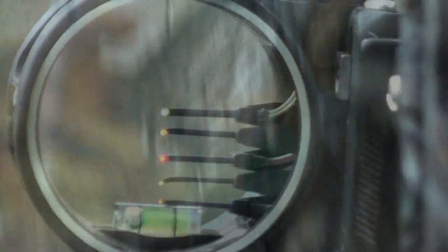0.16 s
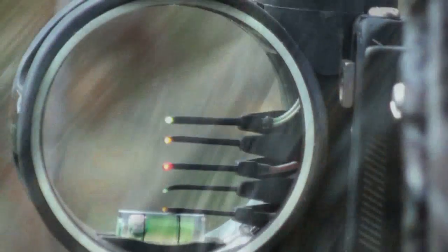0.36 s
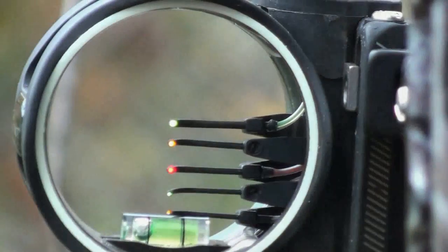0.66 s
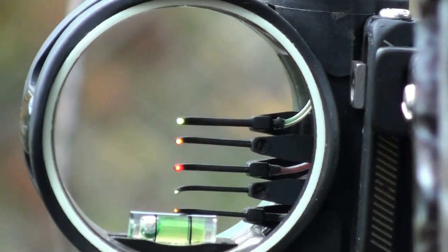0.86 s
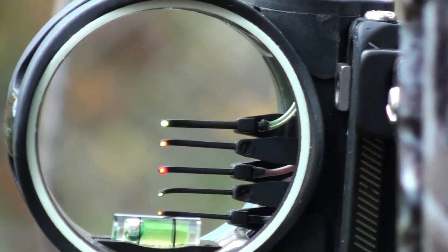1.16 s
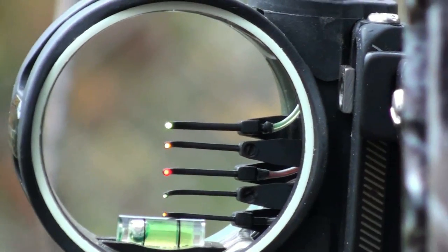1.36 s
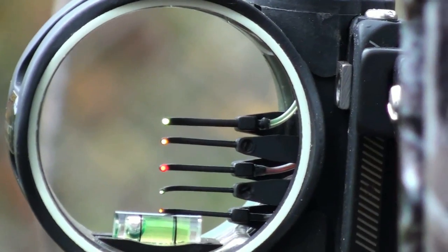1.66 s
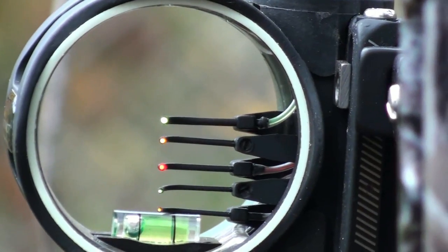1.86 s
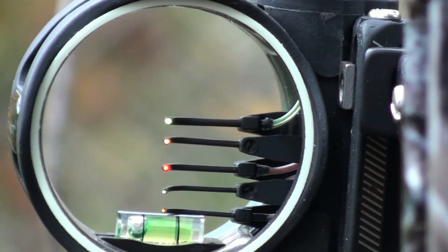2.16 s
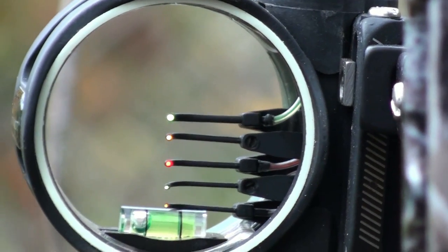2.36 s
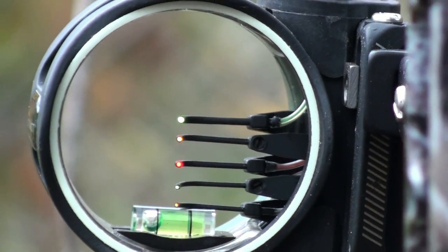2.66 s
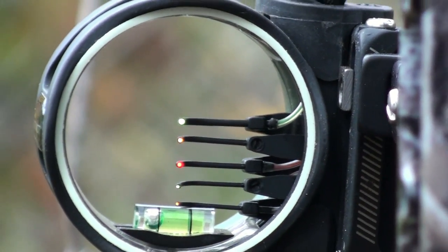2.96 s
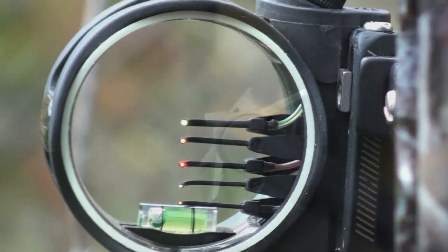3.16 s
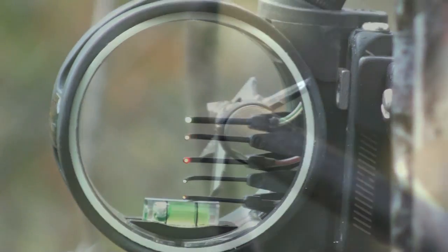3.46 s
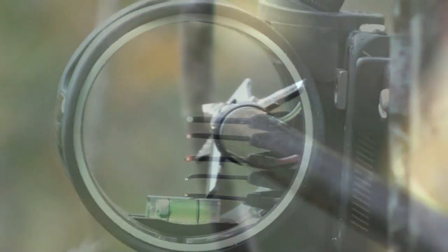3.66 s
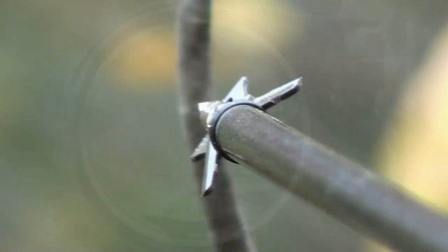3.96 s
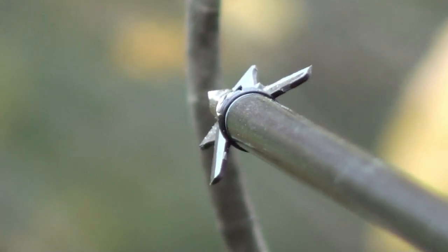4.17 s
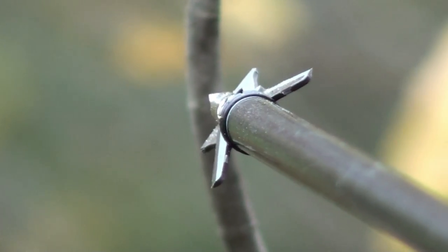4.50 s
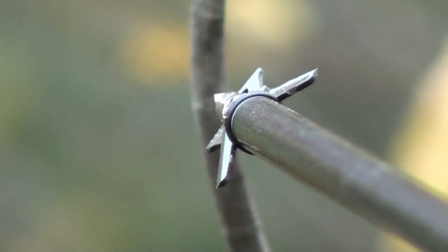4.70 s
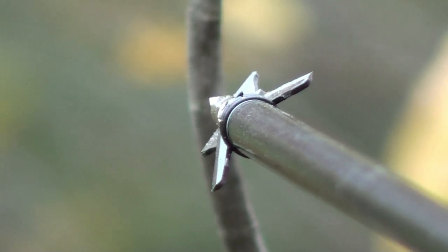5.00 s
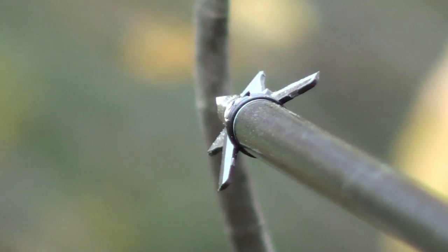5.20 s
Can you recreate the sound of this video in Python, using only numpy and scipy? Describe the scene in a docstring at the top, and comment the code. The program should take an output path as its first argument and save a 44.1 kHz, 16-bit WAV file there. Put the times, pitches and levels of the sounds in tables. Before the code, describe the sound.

Close to a hand-held stereo camera microphone outdoors, low rumble and hiss fade during the first second while hard gear clicks cluster around a third of a second, followed by a small creak and cloth rubs. Afterwards quiet woods remain: a continuous cricket trill, high insect hiss, soft air, one tiny bird chip and a few faint taps.

```python
"""Autumn woodland, heard by a hand-held camera: a tree cricket trills in falling strokes of tone
and far insect choruses hiss as bands of noise. At first gear clicks, rattles and rubs close by, from damped
modes and shaped noise, over a fading throb, rumble and hiss. Later a bird chips on a fast falling tone, a far
one peeps and small things tap on sagging notes. Behind it lie noise for the air and a far motor's hum."""
import sys
import numpy as np
from scipy import signal
from scipy.fft import rfft, irfft, next_fast_len
from scipy.io import wavfile
from scipy.ndimage import uniform_filter1d, map_coordinates

SR = 44100
rng = np.random.default_rng(int(sys.argv[2]) if len(sys.argv) > 2 else 0)


def store_wav(level_fs):
    """Save 16-bit WAV to argv[1]."""
    pcm = np.round(np.clip(np.atleast_2d(level_fs), -1, 1) * 32767)
    wavfile.write(sys.argv[1], SR, pcm.T.astype(np.int16))


N = 235449  # length in samples


def amp(db):
    """Turn dB into gain."""
    return 10 ** (np.asarray(db) / 20)


def unit(x):
    """Scale x to rms 1."""
    return x / np.sqrt(np.mean(x ** 2) + 1e-20)


def along(points, hz):
    """Read a curve of (Hz, value) points on a log frequency axis."""
    point_hz, value = np.transpose(points)
    return np.interp(np.log(hz + 1), np.log(point_hz + 1), value)


def curves(rows):
    """Draw one value per sample for each column after the time."""
    start_s, *columns = np.transpose(rows)
    return [np.interp(np.arange(N) / SR, start_s, column) for column in columns]


def wobble(rate):
    """Draw a smooth random curve with rate knots a second."""
    knots = rng.standard_normal(int(N * rate / SR) + 4)
    return map_coordinates(knots, [np.arange(N) * rate / SR])


def envelope(start, attack, hold, t60):
    """Gain that rises in a line, holds, then decays exponentially."""
    t = np.arange(N) / SR - start
    return np.clip(t / attack, 0, 1) * amp(-60 * np.clip(t - attack - hold, 0, None) / t60)


def fading(length):
    """Gain that falls straight from 1 to 0 over the first length seconds."""
    return np.clip(1 - np.arange(N) / SR / length, 0, 1)


def filtered(x, response):
    """Multiply the spectrum of x by a function of frequency."""
    m = next_fast_len(N + SR // 4)
    return irfft(rfft(x, m) * response(np.fft.rfftfreq(m, 1 / SR)), m)[..., :N]


def ports(pair, lead):
    """Two microphone ports: the left one leads by a phase that depends on frequency."""
    return filtered(pair, lambda hz: np.exp(.5j * np.outer([1, -1], along(lead, hz))))


def rush(spectrum, alike, lead, patchy_db):
    """Stereo noise of rms 1, shaped in spectrum and width, with patches of random gain."""
    z = signal.stft(rng.standard_normal((2, N)), nperseg=512)[2]
    field = rng.standard_normal(z.shape[1:])
    field = uniform_filter1d(uniform_filter1d(field, size=6, axis=0), size=10, axis=1)
    pair = signal.istft(z * amp(patchy_db * unit(field)), nperseg=512)[1][:, :N]

    def mid_side(hz):
        turn = np.arccos(np.clip(along(alike, hz), -1, 1)) / 2  # more likeness, less side
        in_band = (hz >= spectrum[0][0]) * (hz <= spectrum[-1][0])
        return amp(along(spectrum, hz)) * in_band * [np.cos(turn), np.sin(turn)]

    mid, side = filtered(pair, mid_side)
    return unit(ports(np.array([mid + side, mid - side]), lead))


# How long the trees ring on: pitch_hz, decay_t60_s
TREE_DECAY = [(200, 0.18), (2000, 0.072), (10000, 0.26)]


def echo(x):
    """Trunks and ground answer with a noise tail; each frequency dies at its own speed."""
    hz, t, z = signal.stft(rng.standard_normal((2, SR // 4)), SR, nperseg=128)
    decay = amp(-60 * t / along(TREE_DECAY, hz)[:, None])
    tail = signal.istft(z * decay, SR, nperseg=128)[1]
    return signal.fftconvolve(x, tail / np.linalg.norm(tail[0]), axes=1)[:, :N]


# Insect levels through the scene: start_s, low_chorus_level_db, near_cricket_level_db
INSECT_LEVELS = [(0, -66, -66), (.8, -65.5, -67), (1.7, -66, -65.5), (2.2, -66.5, -68), (2.8, -64.5, -62.5),
                 (3.2, -66, -65), (3.55, -66.5, -64), (3.85, -64.5, -64.5), (4.2, -62.5, -61),
                 (4.8, -63, -63), (5.34, -62, -62)]
# Spectrum of farther crickets of the same kind: pitch_hz, level_db (per Hz)
NEIGHBOURS = [(2200, -30), (2300, -8), (2450, -3), (2540, 0), (2610, -8), (2720, -30)]
STROKE_HZ, NEIGHBOURS_DB = 35.77, -69.5  # wing strokes a second; level of the farther singers


def cricket():
    """Each wing stroke is a short tone that falls as the scraper slows; farther singers blur around it."""
    count = np.arange(N) * STROKE_HZ / SR + .655
    stroke = count.astype(int)
    t = (count % 1 - .5) / STROKE_HZ  # seconds from the middle of the stroke
    chance = rng.standard_normal((stroke[-1] + 1, 2))[stroke]
    # 2380 Hz at mid stroke, falling 9600 Hz per second
    phase = 2 * np.pi * (2380 * t - 4800 * t * t) + .5 * chance[:, 0]
    swell = np.exp(-(t / .01) ** 4) * amp(chance[:, 1])
    song = amp(curves(INSECT_LEVELS)[1]) * unit(swell * np.sin(phase))
    near = ports(np.array([song, song]), [(2400, .5)]) + amp(-9) * echo(song[None])
    return near + amp(NEIGHBOURS_DB) * rush(NEIGHBOURS, [(2400, .6)], [(2400, .8)], patchy_db=1.5)


# Spectra of the low and high insect bands: pitch_hz, level_db (per Hz)
LOW_CHORUS = [(3600, -16), (3900, -5.5), (4200, 2), (4420, 4), (4700, -3), (5100, -9.5), (5400, -35)]
HIGH_CHORUS = [(5300, -36), (5600, 3), (5780, 3.5), (6300, 2.5), (6500, 1), (6600, 2.5), (6900, -46)]
HIGH_DB, HIGH_START_DB = -1, -3  # high band over the low one; extra at the very start
FADE_S = 0.94  # the opening's rumble and hiss die while the high chorus comes up


def chorus():
    """Many far insects blur into two noise bands; the lower one still flutters near 47 Hz."""
    beat = 1 + 0.19 * np.sin(2 * np.pi * np.cumsum(47 + 2 * wobble(3.3)) / SR)
    low = beat * rush(LOW_CHORUS, [(4400, 0.66)], [(4400, 0.31)], patchy_db=1.0) * amp([[.7], [-.7]])
    high = rush(HIGH_CHORUS, [(6000, 0.97)], [(6000, 1.38)], patchy_db=1.0) * amp([[1.8], [-1.8]])
    high_gain = amp(HIGH_DB + HIGH_START_DB * fading(FADE_S))
    return amp(curves(INSECT_LEVELS)[0]) * (low + high_gain * high)


# Single gear clicks: start_s, knock_level_db, then over the knock: snap_db, crack_db, thud_db
CLICKS = [(.273, -39, 0, -15, -6), (.292, -15.5, 0, -19, 0), (.31, -18, -1.5, -14, -4.5),
          (0.325, -34, 13, -6, 3), (0.338, -21, 2.5, -12, 1.5), (0.342, -26.5, 8, -16, -12),
          (.3575, -20.5, 1.5, -6, 3), (.359, -12, -4, -13, -3), (.363, -20, 0, -23, -20),
          (.367, -13.5, -6.5, -30, -9), (.37, -22.5, -9, -30, 1), (.375, -32, -1, -17, 7),
          (0.4538, -41, -2, -17, 7), (.571, -42.5, -10, -21, 7), (.64, -33, -7.5, -28, -16),
          (0.666, -44, -15, -12, 1), (0.6692, -28.5, -4, -10, 5), (.901, -44, 3, -17, -7)]
# A run of light slips: start_s
CREAK = [.485, .497, .507, .516, .525, .534]
CREAK_DB, CREAK_FADE_DB, CREAK_THUD_DB = -29, 1.1, -14  # first slip; drop per slip; thud over knock
CREAK_SNAP_DB, CREAK_CRACK_DB, CREAK_DULLS_DB = -1, -10, 1.5  # over knock at first; dulling per slip


def slips():
    """Single clicks, then the creak whose slips grow weaker and duller, as rows like CLICKS."""
    creak = []
    for k, start_s in enumerate(CREAK):
        snap_db = CREAK_SNAP_DB - CREAK_DULLS_DB * k
        crack_db = CREAK_CRACK_DB - 2 * CREAK_DULLS_DB * k
        creak.append((start_s, CREAK_DB - CREAK_FADE_DB * k, snap_db, crack_db, CREAK_THUD_DB))
    return list(CLICKS) + creak


def ring(modes, t):
    """Damped modes at new strengths and phases for each blow and each port."""
    chance = rng.standard_normal((len(modes), 2, 2, 1)) * [[[1.5]], [[.5]]]  # dB, radians
    total = 0
    for (hz, db, t60), (extra_db, phase) in zip(modes, chance):
        total = total + amp(db + extra_db - 60 * t / t60) * np.sin(2 * np.pi * hz * t + phase)
    return total


# Modes of the gear's body, its small parts and its frame: pitch_hz, level_db, decay_t60_s
BODY_MODES = [(1040, -3, .024), (1170, -4, .024), (1320, -8, .02)]
SMALL_PART_MODES = [(1680, -0.5, 0.012), (2065, 1.5, 0.008), (2906, -2.5, 0.0066), (3380, -3, 0.0041),
                    (4910, -13, 0.0053)]
FRAME_MODES = [(300, -18.5, 0.017), (380, -15, 0.037), (594, -28, 0.018), (758, -7.5, 0.03),
               (893, -2, 0.022)]
# Phase between the ports for the close gear: pitch_hz, left_lead_rad
NEAR_LEAD = [(170, 0), (500, 1.8), (1400, 2.6), (2400, 1.7), (5000, 1.2), (10500, 1.5), (11500, -.2)]
GEAR_PAN_DB = -3  # left over right


def clicks():
    """Each slip of the gear knocks its body and frame, snaps its small parts and cracks."""
    out, t = np.zeros((2, N)), np.arange(SR // 10) / SR
    for start_s, db, snap_db, crack_db, thud_db in slips():
        crack = np.diff(rng.standard_normal(len(t) + 1)) * amp(-60 * t / 0.0076)
        knock = ring(BODY_MODES, t) + amp(thud_db) * ring(FRAME_MODES, t)
        knock = knock * (1 - np.exp(-t / 0.00069))
        snap = amp(snap_db) * ring(SMALL_PART_MODES, t) * (1 - np.exp(-t / 0.00019))
        sides = knock + snap * amp([[3], [-3]]) + amp(crack_db) * crack  # the snap faces the left port
        out[:, round(start_s * SR):][:, :len(t)] += sides * amp(db)
    panned = out * amp([[GEAR_PAN_DB / 2], [-GEAR_PAN_DB / 2]])
    # the clicks carry little below 170 Hz and little above 13.5 kHz
    band = lambda hz: 1 / (1 + (hz / 13500) ** 8) / (1 + (170 / (hz + 1)) ** 4)
    return ports(filtered(panned, band), NEAR_LEAD)


# Spectra of the loose parts and of the hiss bursts: pitch_hz, level_db (per Hz)
RATTLE = [(120, -23), (200, -10), (1120, 1.5), (1740, -2), (2010, -13), (2250, -1), (3870, -14.5),
          (9000, -29), (11700, -54), (19800, -120)]
BURST_HISS = [(1760, -32), (3000, -6), (3800, -2), (4310, -0.5), (13300, -6), (15800, -12)]
# Hiss bursts: the big click's short hissing tail, then two cloth slides:
# start_s, attack_s, hold_s, level_db, release_t60_s, stirred_rattle_level_db
HISS_BURSTS = [(0.359, 0.0014, 0.0017, -35, 0.057, -62), (.486, 0.011, 0.03, -54.5, .1, -51),
               (0.649, 0.045, 0.036, -52, 0.085, -49.5)]
# Likeness of left and right in wide sounds: pitch_hz, likeness (0 to 1)
ALIKE = [(20, .75), (60, .85), (170, .55), (340, .3), (700, .5), (2000, .45), (3400, .4), (7000, .3),
         (10500, .2), (11500, .9)]
SHAKE_DB, SHAKE_T60_S = -18, 0.077  # loose parts after each single click, over its knock


def handling():
    """Loose parts rattle in grains after each jolt; a click's tail and two cloth slides hiss and stir them."""
    jolts = np.zeros(N)
    for start_s, db, *_ in CLICKS:
        jolts[round(start_s * SR)] = amp(db + SHAKE_DB)
    decay = amp(-60 * np.arange(SR // 2) / SR / SHAKE_T60_S)
    shake = np.abs(signal.fftconvolve(jolts, decay)[:N])
    burst, stir = np.zeros(N), np.zeros(N)
    for start_s, attack, hold, db, t60, stir_db in HISS_BURSTS:
        swell = envelope(start_s, attack, hold, t60)
        burst += amp(db) * swell
        stir += amp(stir_db) * swell
    grains = amp(4.7 * wobble(500))
    rattle = unit(grains * rush(RATTLE, [(1000, 0.2)], NEAR_LEAD, patchy_db=0.0))
    return (shake + stir) * rattle + burst * rush(BURST_HISS, ALIKE, NEAR_LEAD, patchy_db=1.5)


# Spectra of the opening's rumble and hiss: pitch_hz, level_db (per Hz)
RUMBLE = [(8.8, -31), (15, -1), (34, 2.5), (64, -21), (97, -2), (286, -11), (500, -19.5), (650, -47),
          (1100, -120)]
HISS = [(240, -27), (400, -2.5), (877, -3), (947, 2.5), (1600, -4.5), (2460, -2.5), (11600, -10.5),
        (15800, -21)]
# Phase between the ports for diffuse sound: pitch_hz, left_lead_rad
DIFFUSE_LEAD = [(170, 0), (350, 1.7), (550, 2.3), (2000, 2), (3400, 2.2), (7000, 1.7), (10500, 1.5),
                (11500, -.2)]
RUMBLE_DB, HISS_DB, THROB_DB = -51, -48.5, -57.5  # before the fades
DRONE_HZ, THROB_S = 47.4, .45  # mean pulse rate; fade time of the throb


def opening():
    """A drone of uneven low pulses, its rumble and a broad hiss die away."""
    turn = np.cumsum(DRONE_HZ * (1 + 0.028 * wobble(8.3))) / SR
    pulses = np.diff(np.floor(turn), prepend=0) * amp(1.5 * wobble(40))  # one pulse per turn
    throb = unit(filtered(pulses, lambda hz: (hz > 70) / (1 + (hz / 170) ** 3)))
    rumble = amp(RUMBLE_DB) * rush(RUMBLE, [(30, 0.93), (400, 0.33)], DIFFUSE_LEAD, patchy_db=3.0)
    hiss_lead = [(500, 5.0), (2400, 0.2), (7000, 0.5)]
    hiss = amp(HISS_DB) * rush(HISS, ALIKE, hiss_lead, patchy_db=1.5)
    return amp(THROB_DB) * fading(THROB_S) * throb + fading(FADE_S) * (rumble + hiss)


# Trunks return the chip's low end: delay_s, level_db (over the chip)
CHIP_ANSWERS = [(0.013, -4), (.03, -1), (.047, -14)]
# A far two-note call: start_s, hold_s, level_db
PEEP = [(3.123, 0.022, -58), (3.159, 0.0097, -61)]
CHIP_S, CHIP_DB, CHIP_ATTACK_S, CHIP_HOLD_S, CHIP_T60_S = 1.704, -56, 0.013, .012, 0.094
CHIP_TOP_HZ, CHIP_END_HZ, CHIP_FALL_HZ_PER_S = 12700, 4400, 320000  # falls fast, then stays
PEEP_HZ, PEEP_ATTACK_S, PEEP_T60_S = 1360, 0.0032, 0.015


def bird():
    """One fast falling chip on a rough tone among the trees, and a far peep on a steady tone."""
    t = np.arange(N) / SR
    fall = CHIP_TOP_HZ - CHIP_FALL_HZ_PER_S * (t - CHIP_S)
    hz = np.clip(fall, CHIP_END_HZ, CHIP_TOP_HZ) * (1 + 0.0197 * wobble(900))
    gain = amp(CHIP_DB) * envelope(CHIP_S, CHIP_ATTACK_S, CHIP_HOLD_S, CHIP_T60_S)
    chip = gain * np.sin(2 * np.pi * np.cumsum(hz) / SR)
    dull = filtered(chip, lambda f: 1 / (1 + (f / 6500) ** 6))
    chip = chip + sum(amp(db) * np.roll(dull, round(delay_s * SR)) for delay_s, db in CHIP_ANSWERS)
    notes = sum(amp(db) * envelope(s, PEEP_ATTACK_S, hold, PEEP_T60_S) for s, hold, db in PEEP)
    peep = notes * np.sqrt(2) * np.sin(2 * np.pi * PEEP_HZ * t)
    return chip + amp(-2) * echo(chip[None]) + peep


# Small taps: start_s, pitch_hz (at the start), level_db, decay_t60_s, pan_db (left over right)
TAPS = [(.147, 1880, -42, .02, 4), (2.37, 1610, -43, .03, 3), (2.396, 343, -42.5, 0.029, 3),
        (4.948, 895, -44, .03, -3), (4.9575, 365, -32, 0.017, 7.5)]
TAP_SAG_PER_S = 24  # rate of the pitch's exponential fall


def taps():
    """Soft small taps, each on one damped note that sags."""
    out, t = np.zeros((2, N)), np.arange(SR // 5) / SR
    sagging_s = (1 - np.exp(-TAP_SAG_PER_S * t)) / TAP_SAG_PER_S  # time that slows down
    onset = 1 - np.exp(-t / 0.00052)
    for start_s, hz, db, t60, pan_db in TAPS:
        tap = -amp(db - 60 * t / t60) * np.sin(2 * np.pi * hz * sagging_s) * onset
        out[:, round(start_s * SR):][:, :len(t)] += tap * amp([[pan_db / 2], [-pan_db / 2]])
    return ports(filtered(out, lambda hz: 1 / (1 + (150 / (hz + 1)) ** 4)), DIFFUSE_LEAD)


# Spectra of the air and the hum: pitch_hz, level_db (per Hz)
AIR = [(15, 8), (35, -10.5), (60, -3), (160, -1), (500, 0), (1000, 3), (1700, -1), (2200, -2), (2800, -3.5),
       (3400, -6.5), (5200, -7.5), (7500, -12), (12000, -18.5), (15800, -22)]
HUM = [(60, -70), (80, -14), (97, 12.5), (118, 5.5), (150, -18)]
# Thin steady tones: pitch_hz, level_db (before a slow waver)
WHINE = [(839.8, -76), (1679.6, -86)]
AIR_DB, HUM_DB = -54, -68.5  # before the lull and the wavering
LULL_S, LULL_WIDTH_S, LULL_AIR_DB, LULL_HUM_DB = 3.58, 0.34, -2.5, -5  # air and hum dip once
HUM_RETURNS_DB = 3.5  # the hum is stronger from the middle of the lull on


def woods():
    """Air in the leaves and a wavering low hum, both noise, and a thin tone of steady pitch."""
    t = np.arange(N) / SR
    lull = np.exp(-((t - LULL_S) / LULL_WIDTH_S) ** 2)
    whine = sum(amp(db) * np.sqrt(2) * np.sin(2 * np.pi * hz * t) for hz, db in WHINE)
    whine = whine * amp(2.5 * wobble(4))
    air_db = AIR_DB + LULL_AIR_DB * lull + 0.3 * wobble(6.12)
    air = amp(air_db) * rush(AIR, ALIKE, DIFFUSE_LEAD, patchy_db=1)
    hum_db = HUM_DB + LULL_HUM_DB * lull + HUM_RETURNS_DB * (t > LULL_S) + 1.2 * wobble(5)
    hum = amp(hum_db) * rush(HUM, [(97, 0.93)], DIFFUSE_LEAD, patchy_db=1)
    return air + hum + whine


def scene():
    """Mix all sources at the two ports; the gear's clicks also echo among the trees."""
    gear = clicks()
    close = gear + amp(-16.5) * echo(gear) + handling()
    return cricket() + chorus() + close + opening() + bird() + taps() + woods()


TOP_HZ = 15800


def record(dry):
    """The camera keeps nothing from its band limit upwards."""
    return filtered(dry, lambda hz: hz < TOP_HZ)


dry = scene()
out = record(dry)
store_wav(out)
```